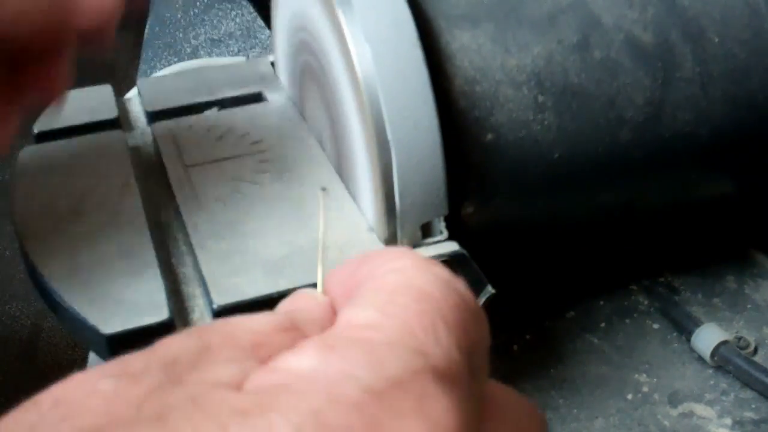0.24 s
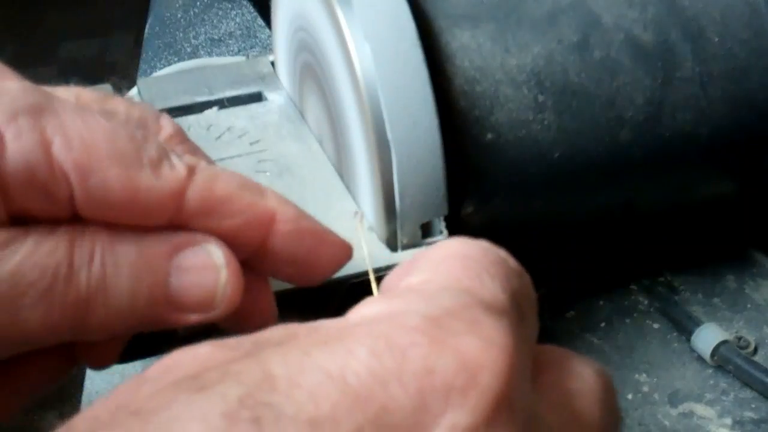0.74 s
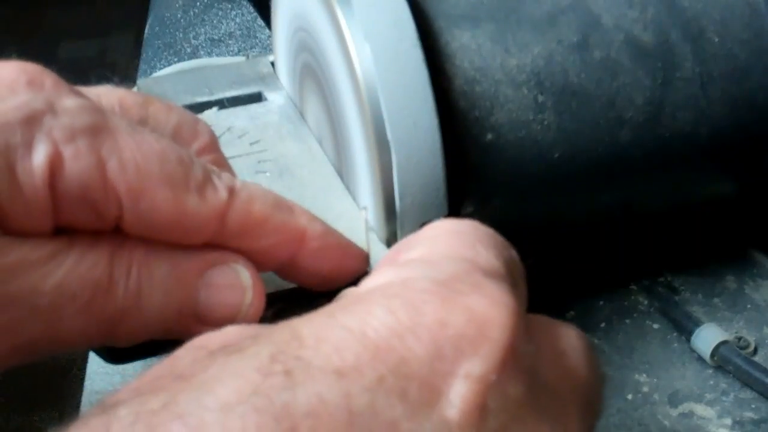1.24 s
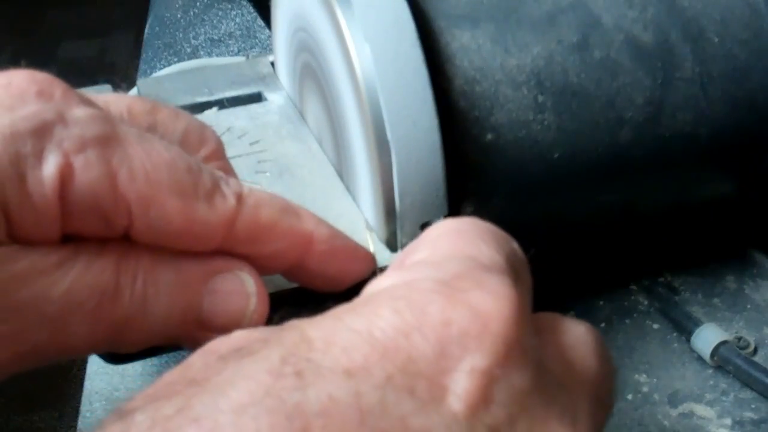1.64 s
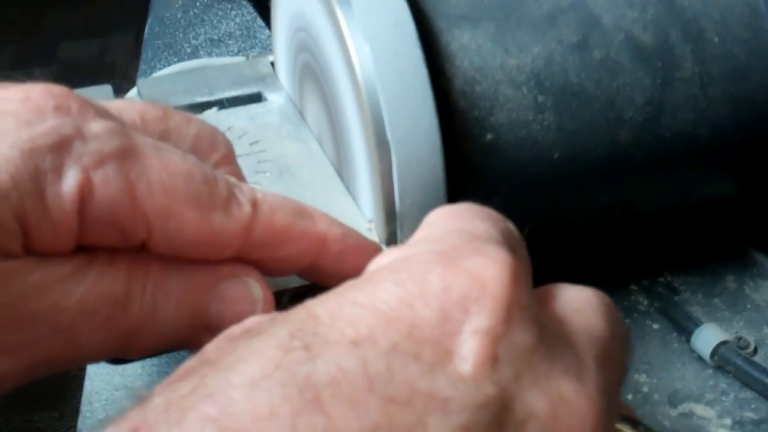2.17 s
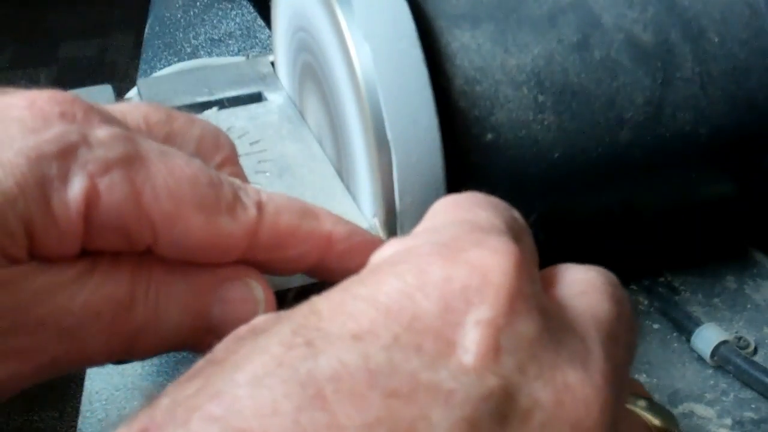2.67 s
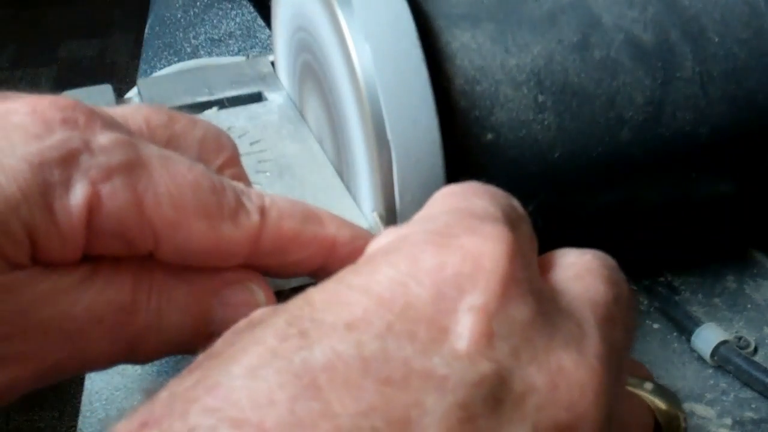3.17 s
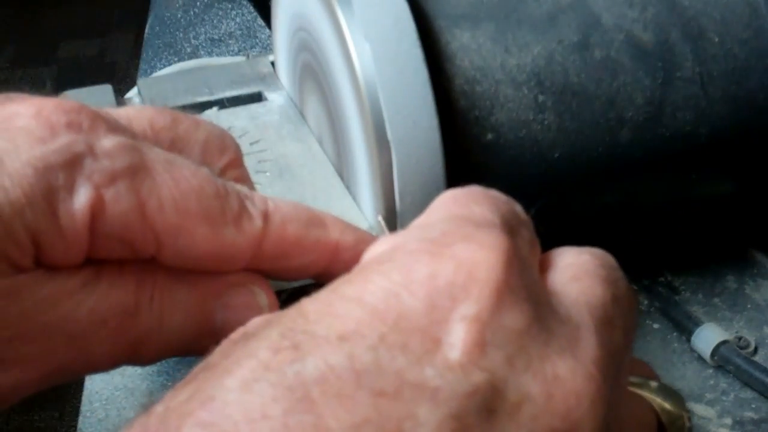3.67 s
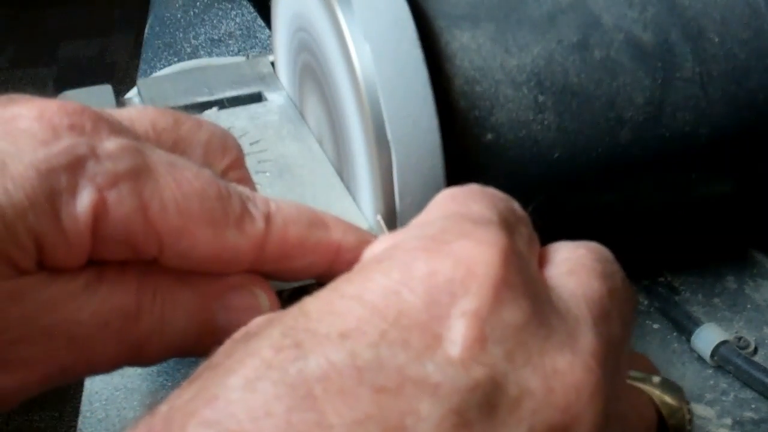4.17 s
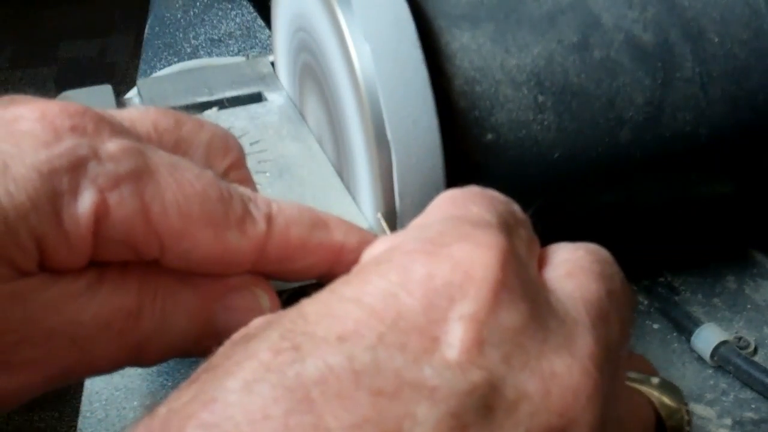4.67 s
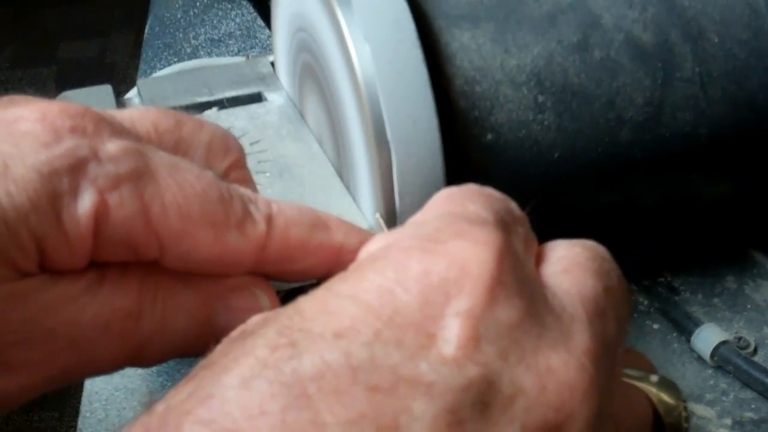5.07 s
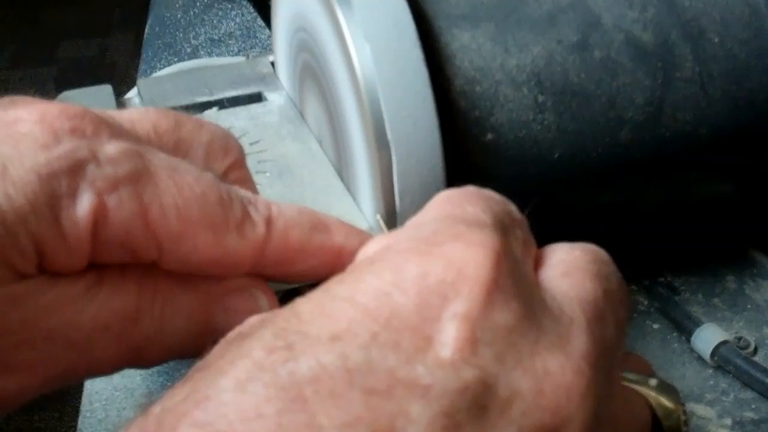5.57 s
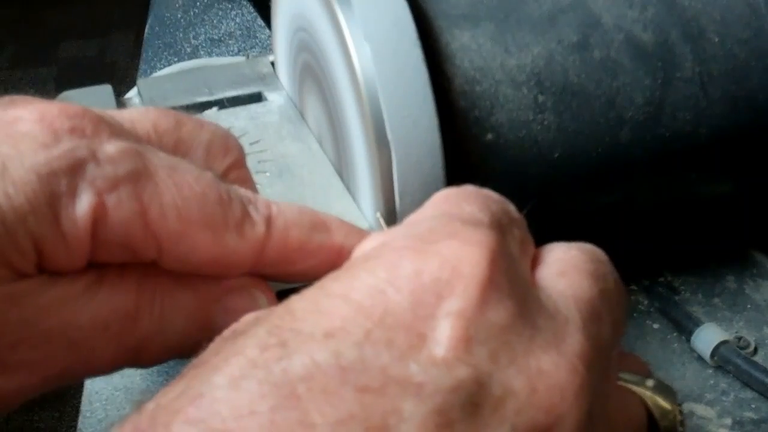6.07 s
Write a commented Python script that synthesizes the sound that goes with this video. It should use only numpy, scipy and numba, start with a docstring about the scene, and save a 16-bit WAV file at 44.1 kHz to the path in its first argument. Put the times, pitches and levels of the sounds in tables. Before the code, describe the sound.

Close in a workshop, a small bench disc sander starts with a brief electrical buzz and rising whine, reaching full speed within half a second. It hums and whirs steadily, a fading bright hiss above it, while a thin high bearing tone swells regularly. After about four seconds a metal wire touches the disc six times, giving harsh, bright, fluttering rasps with a squeal.

```python
"""A small bench disc sander runs up in half a second: mains buzz, shaken frame modes, whines rising through resonance.
It then hums in lines locked to its shaft and bearing, over filtered rolling noise and a fading bright hiss.
Beating bearing tones sing in regular swells, greatest near 3.6 s. From 4.1 s a thin metal wire touches the disc
six times: noise grains, pressed hardest once a turn, excite its modes, and rubbing adds a squeal.
A gain control ducks the whole sound when it is loud and lets it swell back."""
import sys
import numpy as np
from scipy import signal
from scipy.fft import rfft, irfft, next_fast_len
from scipy.io import wavfile
from scipy.ndimage import uniform_filter1d, map_coordinates
from numba import njit

SR = 44100
rng = np.random.default_rng(int(sys.argv[2]) if len(sys.argv) > 2 else 0)


def master(y):
    """Save y as 16-bit WAV."""
    cut = np.clip(np.atleast_2d(y).T, -1, 1)
    pcm = np.round(cut * 32767)  # scale
    wavfile.write(sys.argv[1], SR, pcm.astype(np.int16))


N = 278622
T = np.arange(N) / SR  # time in s
SHAFT_HZ, MAINS_HZ = 59.75, 60  # full shaft speed, supply frequency
RUN_UP_S = 0.45


def undb(db):
    """Logarithmic level: decibels to amplitude gain."""
    return 10 ** (np.asarray(db) / 20)


def unit(x):
    """Normalisation: scale to rms 1."""
    return x / np.sqrt(np.mean(x ** 2))


def walk(rate):
    """Low-passed noise: held random values, smoothed twice, wander with rms 1; rate in values per s."""
    k = int(SR / rate)
    steps = np.repeat(rng.standard_normal(N // k + 1), k)
    smooth = uniform_filter1d(uniform_filter1d(steps, k), k)
    return unit(smooth[:N])


def colour(x, points, modes=()):
    """Minimum-phase filtering: a smooth spectrum with resonances on it, made causal by folding its cepstrum."""
    size = 2 * next_fast_len(N // 2 + SR // 8)
    f = np.arange(size // 2 + 1) * SR / size
    hz, db = np.transpose(points)
    lift = 1 + sum(undb(2 * peak_db) / (1 + (2 * (f - centre) / width) ** 2)
                   for centre, width, peak_db in modes)
    gain = undb(np.interp(np.log(f + 1), np.log(hz), db)) * np.sqrt(lift)
    cepstrum = irfft(np.log(gain))
    cepstrum[1:size // 2] *= 2
    cepstrum[size // 2 + 1:] = 0
    response = np.exp(rfft(cepstrum))
    return irfft(rfft(x, size) * response, size)[:N]


def tone(cycles, flutter_db, wander):
    """Modulated sinusoid: about rms 1, with random wavering of level (dB) and phase (radians)."""
    phase = 2 * np.pi * (cycles + rng.random()) + wander * walk(4.96)
    return np.sqrt(2) * np.sin(phase) * undb(flutter_db * walk(22.13))


def run_up():
    """Induction motor start: pull grows with speed; returns share of full speed and its level in dB."""
    start_share, bend = 0.11, 1.12
    db_per_decade, cold_db, settle_s = 32, 1, 2.4  # louder with speed; the cold machine is a little louder
    progress = np.clip(T / RUN_UP_S, 0, 1)
    speed = start_share + (1 - start_share) * progress ** bend
    cold = progress * np.exp(-np.maximum(T - RUN_UP_S, 0) / settle_s)
    return speed, db_per_decade * np.log10(speed) + cold_db * cold


def starting_hum(turns, speed, motor_db, ring_db=-27, high_db=-33, buzz_db=1, buzz_fade=3.9, whine_rough=0.14):
    """Forced vibration: heavy starting current buzzes in the windings, shakes frame modes; whines cross resonances."""
    # frame modes shaken during the run-up: centre_hz, width_hz, peak_db
    frame_modes = [(453, 37, 15), (760, 77, 11), (960, 25, 21), (1383, 18, 26), (3080, 65, 22.5)]
    # a high frame mode that rings on late in the run-up: centre_hz, width_hz, peak_db
    high_mode = [(3790, 54, 20)]
    # whines: multiple_of_shaft_rate, loudest_at_share_of_full_speed, width_in_that_share, level_db
    flares = [(19, 0.49, 0.077, -46.5), (18.93, .74, 0.1, -36), (23, 0.89, .09, -46),
              (61.7, 0.623, 0.046, -39)]
    harmonics = [np.sin(2 * np.pi * k * MAINS_HZ * T) * undb(db)
                 for k, db in enumerate([-48, -65, -44, -49], start=1)]
    buzz = sum(harmonics) * undb(buzz_db) * (1 - speed) ** buzz_fade

    shake = rng.standard_normal(N) * np.abs(np.sin(2 * np.pi * MAINS_HZ * T))
    ring = unit(colour(shake, [(100, -9), (450, 4), (3800, -6), (6000, -7)], frame_modes))
    ring = ring * undb(ring_db + motor_db) * np.sqrt(1 - speed)
    high = unit(colour(shake, [(1000, -21), (3800, -3), (8000, -16)], high_mode))
    high = high * undb(high_db + motor_db) * (1 - speed) ** 0.13

    whines = 0
    for k, at, width, db in flares:
        whine = tone(k * turns + whine_rough * walk(151), flutter_db=4, wander=0.5)
        whines = whines + whine * np.exp(-((speed - at) / width) ** 2) * undb(db)
    return buzz + ring + high + whines


def hum(turns, speed, race_db=-47, cold_db=7, warm_up_s=0.71):
    """Order-locked radiation: lines follow shaft and ball passage, the higher ones standing out near full speed."""
    # hum of shaft and frame: multiple_of_shaft_rate, level_db
    shaft_orders = [(1, -47), (3, -50.5), (4, -42), (5, -49), (6, -68.5), (8, -44.5), (12, -40), (15, -42),
                    (16, -49.5), (17, -44.5), (18, -39), (19, -39), (21, -46.5), (22, -50), (23, -32),
                    (24, -51), (25, -47.5), (29, -50), (33, -62), (48, -50.5), (50, -46), (63, -47)]
    # balls passing the inner race: multiple_of_passing_rate, level_db
    ball_orders = [(1, -51.5), (12, -44), (13, -39.5), (14, -43.5), (15, -49.5), (16, -43)]
    outer_race, inner_race = 2.629, 4.37  # ball passages per turn
    shaft = sum(undb(db) * speed ** (1 + 0.99 * k)
                * tone(round(k) * turns, flutter_db=min(k / 4, 1) * 1.4, wander=0.22)
                for k, db in shaft_orders)
    balls = sum(undb(db) * tone(round(k) * inner_race * turns, flutter_db=0, wander=0.14)
                for k, db in ball_orders)
    # the outer race drones hardest just after the start, until the grease spreads
    drone_db = race_db + cold_db * np.exp(-(T - RUN_UP_S) / warm_up_s)
    race = undb(drone_db) * tone(outer_race * turns, flutter_db=0.0, wander=0.41)
    return shaft + (balls + race) * speed ** 10


def whirr(turns, whirr_db=-26.0):
    """Broadband excitation of resonances: rolling and air noise in the housing, part repeating every turn."""
    # rolling and windage noise: frequency_hz, density_db
    noise_spectrum = [(40, -35), (100, -18), (230, -11), (520, -9.5), (620, -16), (730, -3), (950, 1),
                      (1250, -9), (2600, -14.5), (6400, -15.5), (7200, -23.5), (10000, -25), (14000, -18)]
    # resonances of the housing: centre_hz, width_hz, peak_db
    housing_modes = [(419, 65, 10.05), (1346, 65, 4.25), (2137, 96, 4.8), (3065, 80, 10.9),
                     (3380, 280, 7.1), (3810, 180, 4.7), (4135, 35, 7.3), (5480, 360, 5.6),
                     (6590, 180, 3.2)]
    # spread over the two microphones: frequency_hz, side_minus_mid_db
    width_spectrum = [(60, -16), (200, -11), (700, -37), (1300, -6.5), (2400, -10.5), (4400, -3.5),
                      (8000, 4), (14000, -1.5)]

    def roughness():
        track = rng.standard_normal(int(SR / SHAFT_HZ))
        repeating = map_coordinates(track, [turns % 1 * len(track)], order=3, mode="grid-wrap")
        repeating = colour(repeating, [(400, -37.5), (1200, -9), (2800, -14.5), (4000, -8), (8000, -1.5),
                                       (13000, -1.0)])
        excitation = (rng.standard_normal(N) + repeating) * undb(0.11 * walk(14))
        return colour(excitation, noise_spectrum, housing_modes)

    mid = unit(roughness())
    side = colour(unit(roughness()), width_spectrum)
    return undb(whirr_db) * np.array([mid + side, mid - side])


def magnetic_hum(speed, hum_db=-46.0, beat_db=4.0, beat_s=1.76, crest_s=2.3):
    """Magnetic force: the stator hums at twice mains rate and throbs slowly as the rotor slips behind the field."""
    beat = np.cos(2 * np.pi * (T - crest_s) / beat_s)
    steady = tone(2 * MAINS_HZ * T, flutter_db=0.1, wander=0.05)
    return steady * undb(hum_db + beat_db * beat) * speed ** 1.5


def singing(speed):
    """Beating: close bearing tones interfere, and swell regularly, rising slowly and falling faster."""
    # the singing cluster: frequency_hz, relative_level_db
    sing_tones = [(3046, -7.5), (3097, 1), (3133, -21)]
    quiet_db, every_s, crest_s, rise_s, fall_s = -40.5, 0.795, 2.82, 0.32, 0.12
    swell_db, greatest_s, spread_s = 15.5, 3.63, 2.5  # the swells grow and die down about greatest_s
    since = (T - crest_s) % every_s  # time since the last crest
    falling = np.exp(-(since / fall_s) ** 2)
    rising = np.exp(-((every_s - since) / rise_s) ** 2)
    wave = np.maximum(falling, rising)
    height_db = swell_db * np.exp(-((T - greatest_s) / spread_s) ** 2)
    cluster = sum(undb(db) * tone(hz * T, flutter_db=0.6, wander=0.29) for hz, db in sing_tones)
    return undb(quiet_db + height_db * wave) * speed ** 1.8 * cluster


def motor(turns, speed, motor_db):
    """Interaural-type delay and level cues: the machine stands to the right, so the left microphone hears it later."""
    # balance between the microphones: frequency_hz, left_minus_right_db
    lean = [(60, 0.5), (130, 0), (380, 0.6), (700, -2.5), (1300, -1.5), (2400, 1), (4400, 2), (14000, 4.5)]
    running = (hum(turns, speed) + whirr(turns)) * undb(motor_db)
    left, right = running + magnetic_hum(speed) + singing(speed) + starting_hum(turns, speed, motor_db)
    left = np.concatenate([np.zeros(3), left[:-3]])  # delay in samples
    left = colour(left, [(hz, db / 2) for hz, db in lean])
    right = colour(right, [(hz, -db / 2) for hz, db in lean])
    return np.array([left, right])


def cold_hiss(speed, hiss_db=-39, fade_s=1.8, speed_power=2.2):
    """Filtered noise with exponential decay: a bright hiss rises with speed and fades as the machine runs in."""
    # extra hiss of the cold machine: frequency_hz, density_db
    hiss_spectrum = [(300, -30), (1200, -12), (2100, 0), (3000, -6), (5000, -10), (8500, 14), (13000, -3)]
    fade = np.exp(-np.maximum(T - RUN_UP_S, 0) / fade_s)
    hiss = np.array([unit(colour(rng.standard_normal(N), hiss_spectrum)) for _ in range(2)])
    return hiss * undb(hiss_db) * speed ** speed_power * fade


def pressing(turns):
    """Contact force: each touch sets in, holds, eases or firms, and lifts off; the disc's wobble throbs in it."""
    # touches of the wire on the disc:
    # start_s, length_s, attack_s, release_s, level_db, pressure_change_db_per_s, once_a_turn_throb_db
    touches = [(4.075, .182, 0.02, 0.032, -12.5, 0.5, 11), (4.295, 0.037, .01, 0.014, -25.5, 0, 4),
               (4.61, 0.28, 0.092, 0.019, -5, -31, 7), (5.148, 0.28, 0.023, .15, -12.5, 4, 10.5),
               (5.385, 0.21, 0.021, 0.12, -8, -45, 8.5), (5.704, .65, 0.12, .02, -16.5, 14, 5.5)]
    # relative gap over one turn: smallest, so pressed hardest, as the turn closes
    gap = np.interp(turns % 1, [0, .18, .45, .72, .9, 1], [0.24, 0.39, 1.0, 1.0, 0.3, 0.032])
    force = np.zeros(N)
    for start, length, attack, release, db, db_per_s, throb_db in touches:
        age = np.clip(T - start, 0, length)
        contact = np.clip(np.minimum(age / attack, (length - age) / release), 0, 1)
        force = force + contact * undb(db + db_per_s * age + throb_db * (0.49 - gap))
    return force


def grinding(turns, left_db=5.0, spread_db=-4.5, grit_db=1.5, rasp_db=0.5, tremor_db=0.73):
    """Impact excitation and stick-slip: dense grit strikes the wire's tip, hardest as the high spot comes round."""
    # rasp of the grit: frequency_hz, density_db
    rasp_spectrum = [(300, -28), (2000, -18.5), (3000, -6.5), (4400, -8.5), (5000, -8.5), (6400, -1.5),
                     (7100, -14.5), (7600, -1.5), (9100, -6), (10800, -3), (11700, 0.5), (14200, -1)]
    # modes of the wire: centre_hz, width_hz, peak_db
    wire_modes = [(3364, 19, 17.5), (5317, 140, 21), (5880, 46, 14.6), (8250, 103, 15.5), (8640, 62, 14.5),
                  (9200, 40, 4.2), (9720, 100, 10), (11600, 58, 1.7), (12220, 220, 6.9), (14040, 270, 5.6)]
    # modes that the rubbing drives into a squeal: frequency_hz, level_db
    squeal_modes = [(5310, -9.5), (8210, -13)]
    pressure = pressing(turns) * undb(tremor_db * walk(60))
    loudness = np.std(colour(rng.standard_normal(N), rasp_spectrum, wire_modes))

    def rasp():
        grains = unit(rng.standard_normal(N) * undb(grit_db * rng.exponential(size=N)))
        return colour(grains * pressure, rasp_spectrum, wire_modes) * undb(rasp_db) / loudness

    # stick and slip keep these modes going only while the tip is pressed; the fingers damp them at once
    squeal = pressure * sum(undb(db) * tone(hz * T + 0.164 * walk(130), flutter_db=4.5, wander=0.87)
                            for hz, db in squeal_modes)
    mid = rasp() + squeal
    side = undb(spread_db) * rasp()
    return np.array([(mid + side) * undb(left_db / 2), (mid - side) * undb(-left_db / 2)])


@njit
def ride(excess, attack, hold, release):
    """Compression ballistics: the cut in dB closes on any excess, waits, then opens at a steady rate."""
    # attack: share of the excess closed per sample; hold: samples; release: dB per sample
    out, cut, wait = np.empty(len(excess)), 0., 0.
    for i in range(len(excess)):
        if excess[i] > cut:
            cut += (excess[i] - cut) * attack
            wait = hold
        elif wait > 0:
            wait -= 1
        else:
            cut = max(cut - release, 0.)
        out[i] = cut
    return out


def gain_control(x, threshold_db=-20.5, attack_s=0.0093, hold_s=0.095, release_db_per_s=52, window_s=0.0049):
    """Dynamic compression: a loud left channel turns both down; the sensor is least sensitive near 3 kHz."""
    sensed = colour(x[0], [(1000, 4.5), (3000, -12.5), (5000, 0)])
    power = uniform_filter1d(sensed ** 2, max(int(window_s * SR), 1))
    excess = 10 * np.log10(np.abs(power) + 1e-12) - threshold_db
    cut_db = ride(excess, 1 / (attack_s * SR), float(hold_s * SR), release_db_per_s / SR)
    return x * undb(-cut_db)


def scene():
    """Superposition: the motor, the wire and the hiss add, all following the turning shaft."""
    high_spot_s = 5.172  # a moment when the disc's high spot meets the wire
    speed, motor_db = run_up()
    turns = np.cumsum(speed) * SHAFT_HZ / SR
    turns = turns - np.interp(high_spot_s, T, turns)
    return motor(turns, speed, motor_db) + grinding(turns) + cold_hiss(speed)


def record(dry):
    """Compression and band limiting: gain control, then a steep elliptic low-pass."""
    top_hz = 14150
    low_pass = signal.ellip(12, .2, 80, top_hz, fs=SR, output="sos")
    return signal.sosfilt(low_pass, gain_control(dry))


dry = scene()
out = record(dry)
master(out)
```